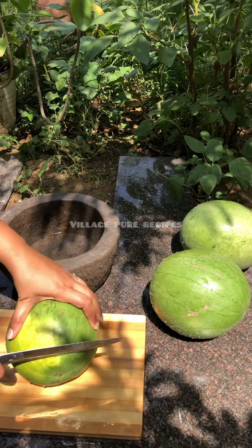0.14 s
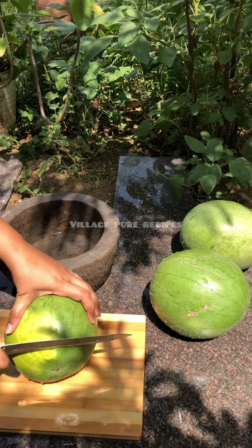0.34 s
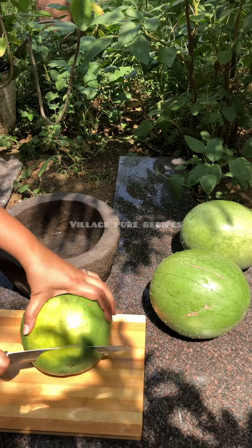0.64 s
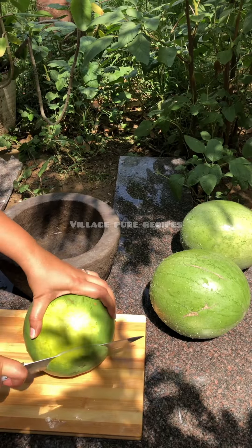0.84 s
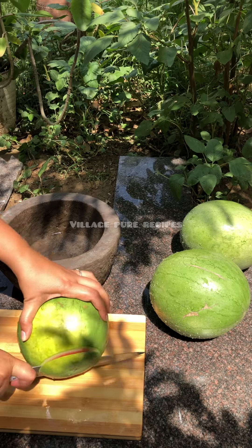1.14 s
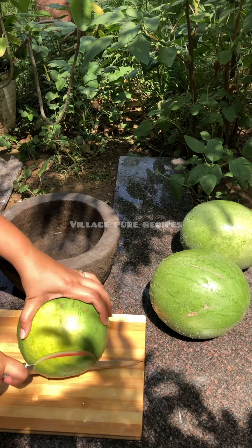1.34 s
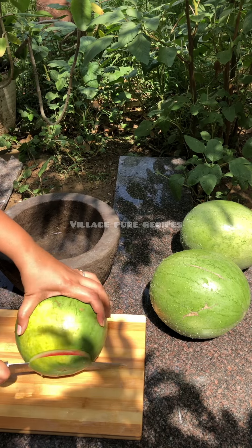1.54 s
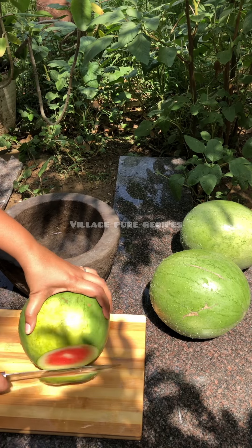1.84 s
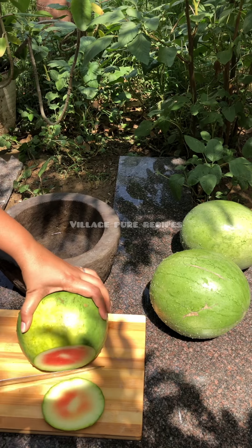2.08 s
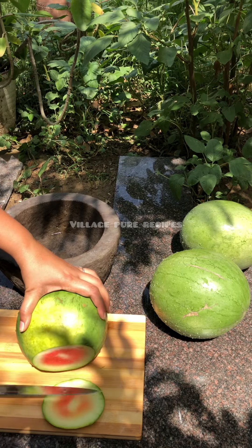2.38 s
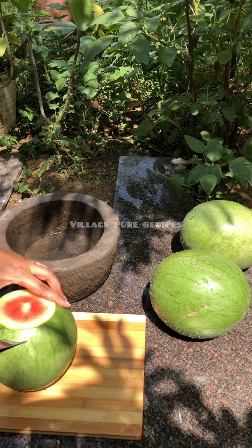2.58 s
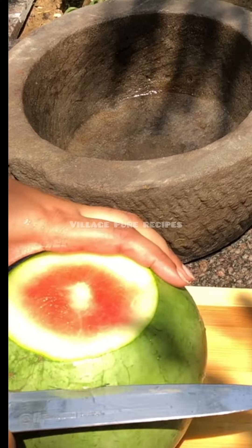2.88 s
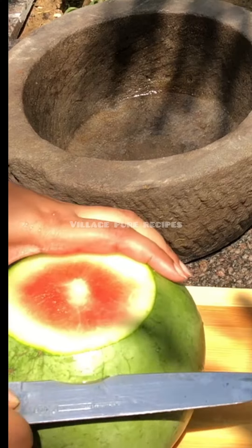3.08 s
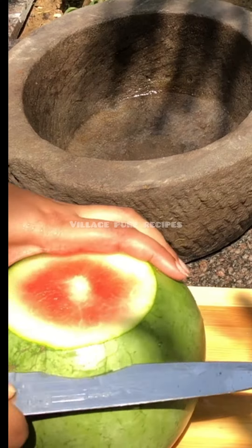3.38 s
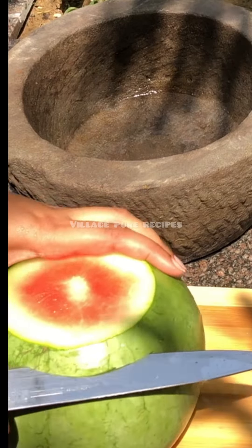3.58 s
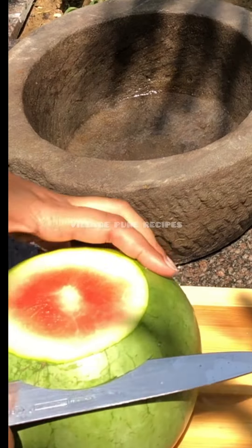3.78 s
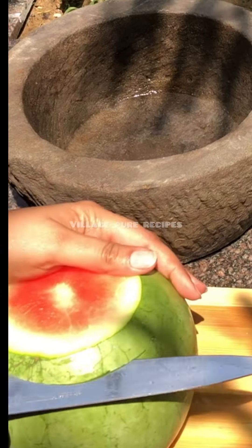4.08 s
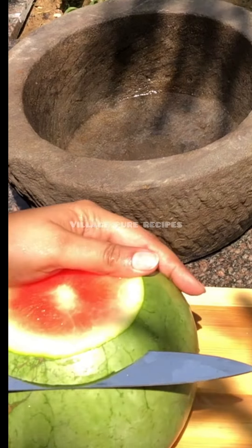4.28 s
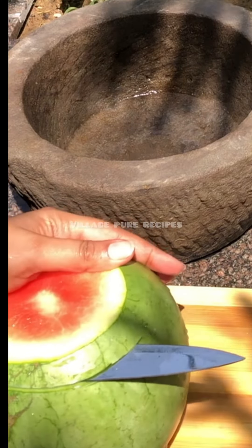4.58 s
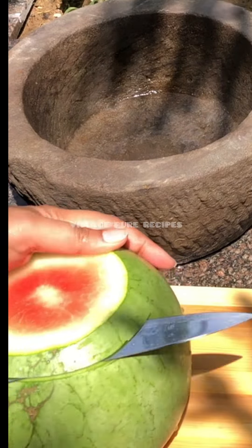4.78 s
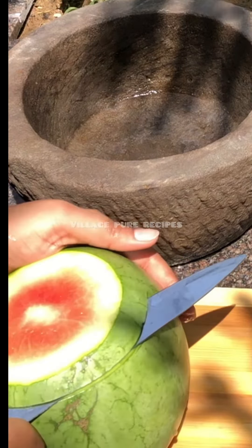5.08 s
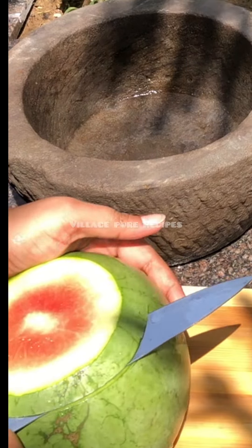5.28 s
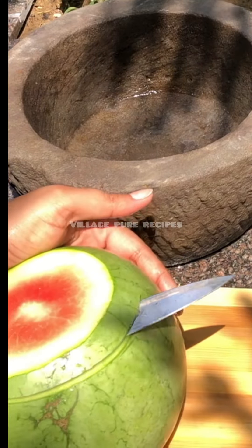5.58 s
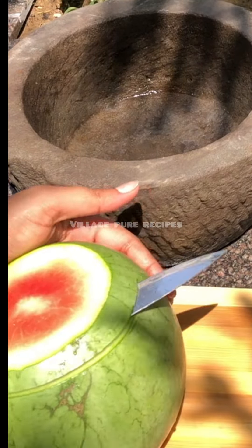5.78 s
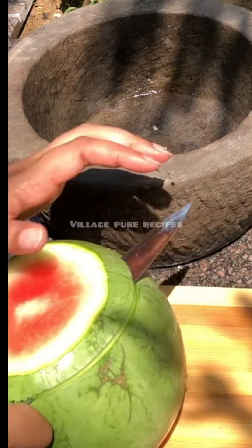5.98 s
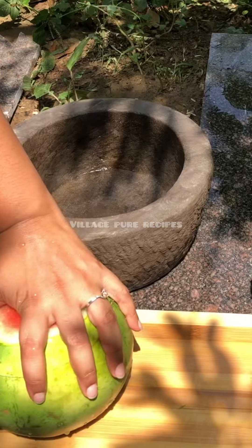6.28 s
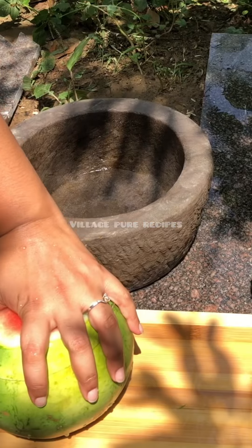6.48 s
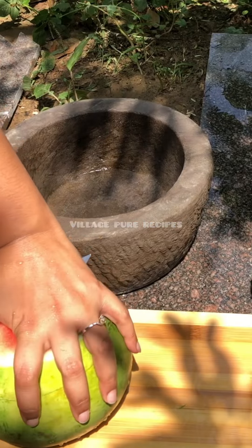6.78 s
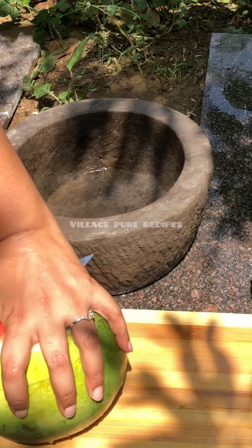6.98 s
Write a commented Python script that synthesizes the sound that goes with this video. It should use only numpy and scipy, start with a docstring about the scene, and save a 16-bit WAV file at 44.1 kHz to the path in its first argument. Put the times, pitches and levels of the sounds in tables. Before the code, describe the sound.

In an open garden, a near microphone catches soft, brief tearing noises from a knife in melon rind, growing crunchier, then a hard crack against a board and a small wet slap. More spaced crunches, tiny squeaks and dull bumps come after. Behind them lie low engine drone, an intermittent motor hum, faint hiss, sparse small birds and one raspy screech near the end.

```python
"""A kitchen knife slices a watermelon on a wooden board in a garden yard: bursts of clicks make the tearing rind.
The rind tears in short crackling strokes and the hollow fruit rings; the blade breaks through with a crack
on the board, and the slice flops over with wet smacks, made of fast-fading noise.
Behind, harmonics make a far throbbing engine and an electric motor that hums on and off. Small birds chirp,
a larger one screeches through a resonant throat, and shaped noise gives the garden's wash, rumble and hiss."""
import sys
import numpy as np
from scipy import signal
from scipy.fft import rfft, irfft, next_fast_len
from scipy.io import wavfile
from scipy.ndimage import uniform_filter1d

SR = 44100
rng = np.random.default_rng(int(sys.argv[2]) if len(sys.argv) > 2 else 0)


def generate_wav(signal):
    """Clip the signal to [-1, 1] and save it as 16-bit WAV at the path in sys.argv[1]."""
    frames = np.transpose(np.atleast_2d(signal))
    scaled = np.clip(frames, -1, 1) * 32767
    pcm = np.round(scaled).astype(np.int16)
    wavfile.write(sys.argv[1], SR, pcm)


N = 314785
T = np.arange(N) / SR  # seconds


def from_db(db):
    """Decibels to gain."""
    return 10 ** (np.asarray(db) / 20)


def rms_one(x):
    """Scale to unit power."""
    return x / np.sqrt(np.mean(x ** 2) + 1e-20)


def at_hz(points, hz, axis=1):
    """Read a table column on a log-frequency axis."""
    points = np.array(points)
    return np.interp(np.log(np.maximum(hz, 1)), np.log(points[:, 0]), points[:, axis])


def coloured(x, spectrum, tilt_db=0):
    """Filter a noise by a spectrum, tilted in dB per octave, and scale it to rms 1."""
    size = next_fast_len(len(x))
    hz = np.maximum(np.fft.rfftfreq(size, 1 / SR), 1)
    gain = from_db(at_hz(spectrum, hz) + tilt_db * np.log2(hz))
    return rms_one(irfft(rfft(x, size) * gain, size)[:len(x)])


def drift(rate):
    """Random wander of rms 1: straight lines between random points, so many per second."""
    own_rng = np.random.default_rng(rng.integers(2 ** 31))
    knots = own_rng.standard_normal(int(T[-1] * rate) + 2)
    return rms_one(np.interp(T * rate, np.arange(len(knots)), knots))


def cycles(hz):
    """Running phase in radians of a moving frequency, from a random start."""
    return 2 * np.pi * (np.cumsum(hz) / SR + rng.random())


def swell(s, rise, fall):
    """A bell-shaped envelope with its own rise and fall in seconds."""
    distance = (T - s) / np.where(T < s, rise, fall)
    return np.exp(-np.minimum(distance ** 2 / 2, 30))


def tap(s, db):
    """A single push, one sample long."""
    return from_db(db) * (np.arange(N) == round(s * SR))


def ring(force, modes):
    """A force sets damped modes ringing, neighbours in opposite sense."""
    out = 0
    for k, (hz, db, t60) in enumerate(modes):
        radius = np.exp(-np.log(1000) / (t60 * SR))
        angle = 2 * np.pi * hz / SR
        feedback = [1, -2 * radius * np.cos(angle), radius ** 2]
        mode = signal.lfilter([0, np.sin(angle)], feedback, force + 1e-18)
        out = out + (-1) ** k * from_db(db) * mode
    return out


def low_pass(x, hz, order=2):
    """Take the edge off."""
    return signal.sosfilt(signal.butter(order, min(hz, SR / 2 - 100), fs=SR, output="sos"), x)


def whistles(rows, waver):
    """Short unsteady sine tones under bell-shaped envelopes."""
    wobble = 1 + waver * drift(700)
    out = 0
    for s, hz, length, db in rows:
        tone = np.sqrt(2) * np.sin(cycles(hz * wobble))
        out = out + from_db(db) * swell(s, length, length) * tone
    return out


# Knife strokes. Each row: peak in seconds, bell spread in seconds, tearing level in dB,
# brightness in dB per octave, level of the melon's hollow ring in dB.
STROKES = [(0.526, .024, -69, -1, -83.5), (.657, 0.011, -72.5, 1, -80), (0.807, 0.038, -65, -2, -84),
           (1.11, 0.027, -62.5, 2, -60), (1.15, .029, -53, 0, -63), (1.491, 0.049, -69, -4.5, -65.5),
           (1.61, 0.026, -66, -2, -83), (1.70, .032, -56.5, -1.5, -70), (1.861, 0.021, -62, -2, -60),
           (2.667, 0.0086, -69, 2.5, -84), (3.446, 0.02, -62, -3, -61.5), (3.623, 0.021, -63, -2.5, -60.5),
           (4.163, 0.025, -56, -1, -56.5), (4.586, 0.028, -58, -1, -57.5), (4.788, .017, -72.5, 0, -76.5),
           (5.335, .045, -67.5, -.5, -80), (5.447, 0.029, -69.5, -1.5, -77), (5.51, 0.017, -60, -.5, -69),
           (5.605, .025, -57.5, -2.5, -55.5), (5.812, 0.032, -74, -4, -80), (6.3, .03, -68.5, -2.5, -72)]
# Colour of tearing rind. Each row: frequency in Hz, density in dB per Hz.
RIND = [(250, -18.5), (600, -10), (1100, -3.5), (1600, -1), (2000, -6), (2500, -2), (2950, -2.5), (3500, 0),
        (4500, -1.5), (6000, -5), (8200, -9.5), (10000, -16), (15000, -25)]
# Modes of the hollow melon. Each row: frequency in Hz, level in dB, t60 in seconds.
MELON = [(231, -3, 0.046), (438, -1, .075), (675, -13.5, .06)]
# Wet rind squeaking on the steel. Each row: peak in seconds, pitch in Hz, bell spread in seconds, level in dB.
SQUEAKS = [(1.108, 3780, 0.011, -55.5), (1.68, 2480, 0.03, -62), (5.595, 4400, 0.016, -60)]


def slicing(cells_per_s, size_db, judder_db, patchy_db):
    """Cells burst in dense uneven clicks under the blade and shake the hollow fruit."""
    sizes = from_db(size_db * np.minimum(rng.exponential(1, N), 4)) * rng.choice([-1, 1], N)
    bursting = rng.random(N) < cells_per_s / SR
    bursts = sizes * bursting * from_db(judder_db * drift(220))
    hollow = rms_one(ring(bursts, MELON))
    hz = np.geomspace(250, 15000, 40)
    out = np.zeros(N)
    for s, length, tear_db, tilt_db, hollow_db in STROKES:
        near = np.abs(T - s) < 1 / 4
        speed = swell(s, length, length)
        # each stroke gets its own random, patchy colour
        patchy = patchy_db * rng.standard_normal(len(hz))
        colour = np.column_stack([hz, at_hz(RIND, hz) + patchy])
        out[near] += from_db(tear_db) * speed[near] * coloured(bursts[near], colour, tilt_db)
        out += from_db(hollow_db) * speed * hollow
    return out + whistles(SQUEAKS, waver=0.05)


def grit(colour, decay_s, tilt_db=0):
    """A short burst of snapping fibres: coloured noise, fading fast."""
    t = T[:SR // 10]
    return coloured(rng.standard_normal(len(t)), colour, tilt_db) * np.exp(-t / decay_s)


# Flesh parting or landing. Each row: start in seconds, level in dB, decay in seconds, brightness in dB per octave.
SMACKS = [(1.8544, -52, 0.0018, 1), (1.8673, -40.5, 0.0035, -1.5), (1.9715, -22.5, 0.0016, -2),
          (2.089, -56.5, 0.0025, -1.5), (3.939, -52.5, 0.0041, -3.5)]
# Colour of the smacks. Each row: frequency in Hz, density in dB per Hz.
WET_FLESH = [(400, -19.5), (1200, -13.5), (1800, -2.5), (2600, 1.5), (3900, -3), (4800, -16), (7500, -14.5),
             (11500, -19), (15500, -30.5)]


def smacks(rise_s):
    """Wet flesh tears free or slaps the wood: grit with a softened onset."""
    out = np.zeros(N)
    for s, db, decay_s, tilt_db in SMACKS:
        burst = from_db(db) * grit(WET_FLESH, decay_s, tilt_db)
        start = round(s * SR)
        out[start:start + len(burst)] += burst * np.tanh(T[:len(burst)] / rise_s)
    return out


# Soft bumps of the melon on the board. Each row: start in seconds, push in dB.
BUMPS = [(1.49, -62), (1.975, -33), (3.462, -53), (3.635, -48), (3.944, -49.5), (5.405, -49), (5.616, -40),
         (5.92, -51.5)]


def bumps():
    """Each soft bump is one push that rings the melon's hollow modes."""
    return ring(sum(tap(s, db) for s, db in BUMPS), MELON)


# Hard contacts. Each row: start in seconds, click push in dB, click hardness (low-pass) in Hz,
# board thud push in dB, thud hardness (low-pass) in Hz.
BLOWS = [(1.8774, 2.5, 12000, -1, 4950), (1.9716, -39, 1993, -31, 688), (2.0756, -52, 7006, -37.5, 1203),
         (3.941, -37.5, 1300, -33, 607.5), (5.916, -54.5, 1300, -39, 991), (5.972, -62, 1390, -45.5, 1000)]
# Modes of the blade's click. Each row: frequency in Hz, level in dB, t60 in seconds.
BLADE = [(1300, -8, 0.004), (1850, -9, .006), (3050, -9.5, .009), (4620, -5.5, 0.0054), (5213, -11, .007),
         (6250, -17, .008), (7300, -20.5, 0.0071), (8680, -27.5, 0.0094), (10800, -26.5, 0.0034)]
# Modes of the wooden board. Each row: frequency in Hz, level in dB, t60 in seconds.
BOARD = [(224, -37, 0.03), (435, -16.5, 0.03), (585, -7.5, 0.02), (860, -5.5, 0.017), (1185, -16, .03),
         (1572, -15, .022), (1850, -21.5, .03), (2480, -11, 0.02), (3307, -30, 0.02)]
THUD_LAG_S = .0027


def blows(crack_db, crack_s, echo_db, echo_top_hz):
    """The edge clicks first, then the weight behind it thuds into the board; both scatter round the yard."""
    click = sum(low_pass(tap(s, db), hz) for s, db, hz, _, _ in BLOWS)
    thud = sum(low_pass(tap(s + THUD_LAG_S, db), hz) for s, _, _, db, hz in BLOWS)
    crack = from_db(crack_db) * signal.fftconvolve(thud, grit(RIND, crack_s))[:N]
    # heard from all sides at once, the modes blur into an even echo
    contact = low_pass(click + thud, echo_top_hz, order=3)
    echo = from_db(echo_db) * yard(contact, stretch=0.93, build_s=.0045)
    return ring(click, BLADE) + ring(thud, BOARD) + crack + echo


# The yard's echo. Each row: frequency in Hz, level in dB, t60 in seconds before stretching.
YARD = [(200, -8, .45), (450, 0.5, .45), (900, -0.5, 0.714), (1800, -1, 0.33), (3470, -7.5, 0.24),
        (6000, -8, .34), (12000, -3, 0.13)]


def yard(x, stretch, build_s):
    """Scatter from walls and leaves builds up, then dies band by band; stretch lengthens the ring."""
    t, tail = T[:SR], 0
    edges = np.geomspace(140, 16000, 13)
    for low, high in zip(edges, edges[1:]):
        hz = np.sqrt(low * high)
        band_pass = signal.butter(2, [low, high], "band", fs=SR, output="sos")
        band = signal.sosfilt(band_pass, rng.standard_normal(SR))
        t60 = stretch * at_hz(YARD, hz, axis=2)
        tail = tail + band * from_db(at_hz(YARD, hz)) * np.exp(-np.log(1000) * t / t60)
    tail = tail * (1 - np.exp(-(t / build_s) ** 2))
    return signal.fftconvolve(x, tail / np.linalg.norm(tail))[:N]


# Pushes of the screech. Each row: peak in seconds, rise in seconds, fall in seconds, level in dB before distance.
SCREECH_PUSHES = [(6.372, .0075, .034, -49), (6.468, .021, 0.024, -49)]
# Resonances of the larger bird's throat. Each row: frequency in Hz, level in dB.
THROAT = [(1000, -32), (1700, -22), (2100, -12.5), (2600, -3), (2850, -6), (3050, -21), (3300, -15),
          (3550, 0), (3950, 1), (4400, -3), (4950, -6), (5600, -14), (6300, -15), (7000, -26), (10000, -34),
          (14000, -50)]
# Thin chirps of small birds. Each row: peak in seconds, pitch in Hz, bell spread in seconds,
# level in dB before distance.
CHIRPS = [(.965, 4535, 0.019, -68.5), (3.13, 3710, 0.015, -68), (3.725, 5450, 0.025, -71),
          (6.17, 3804, 0.031, -70.5)]
# the screech arches up from its resting pitch and back
SCREECH_S, SCREECH_REST_HZ, SCREECH_TOP_HZ = 6.414, 850, 1400
ARCH_RISE_S, ARCH_FALL_S = .034, .046


def birds():
    """A harsh arched call, its jittering harmonics sweeping through the throat's resonances; small chirps."""
    arch = swell(SCREECH_S, ARCH_RISE_S, ARCH_FALL_S)
    pitch = SCREECH_REST_HZ + (SCREECH_TOP_HZ - SCREECH_REST_HZ) * arch
    pitch = pitch * (1 + .022 * drift(700))
    phase = cycles(pitch)
    call = sum(from_db(at_hz(THROAT, k * pitch)) * np.sin(k * phase) for k in range(1, 5))
    rasp = from_db(-7) * coloured(rng.standard_normal(N), THROAT)
    effort = sum(from_db(db) * swell(s, rise, fall) for s, rise, fall, db in SCREECH_PUSHES)
    roughness = from_db(2.0 * drift(180))
    return effort * roughness * (call + rasp) + whistles(CHIRPS, waver=0.13)


# Faint low hoots. Each row: peak in seconds, pitch in Hz, bell spread in seconds, level in dB.
HOOTS = [(.45, 741, 0.018, -64.5), (4.11, 670, 0.036, -65), (6.065, 644, 0.02, -62)]


def hoots():
    """Each hoot is a short, slightly unsteady low tone."""
    return whistles(HOOTS, waver=0.039)


SHIFT_S = 0.046  # length of the slide between stretches


def stepped(rows):
    """Each column holds its value, then slides to the next row's, centred on that row's start."""
    s, *columns = np.transpose(rows)
    row = np.maximum(np.searchsorted(s, T, side="right") - 1, 0)
    return [uniform_filter1d(c[row], max(int(SHIFT_S * SR), 1)) for c in columns]


# The background in stretches. Each row: start in seconds, engine level in dB, pitch that booms most in Hz,
# wash level in dB, rumble level in dB, clatter level in dB.
STRETCHES = [(0, -62, 169, -64, -57, -63.5), (.502, -55.5, 148.7, -63.5, -56.5, -64),
             (2.489, -56.5, 150.1, -65, -61.5, -75), (2.829, -64.5, 157.8, -65.5, -63, -76.5),
             (6.108, -68.5, 219.5, -65.5, -63.5, -78)]
# Colour of the engine's exhaust. Each row: frequency in Hz, level in dB.
EXHAUST = [(45, -13.5), (75, -14.5), (100, -12), (123, -5.5), (137, -3.5), (147, -2), (170, -4.5),
           (195, -4), (221, -4), (250, -24), (340, -16.5)]
# The drone swelling around one pitch. Each row: peak in seconds, bell spread in seconds, pitch in Hz, gain in dB.
SWELLS = [(.85, .16, 119, 7), (.85, .16, 224, 6), (1.501, .17, 204, 13), (2.3, .14, 151.7, 5),
          (4.85, .6, 175.4, 10.5), (5.501, .42, 227.7, 8.5)]
# the engine idles, is throttled up once, and creeps faster from then on
IDLE_FIRINGS_PER_S, CREEP_PER_S2 = 24.55, .5
THROTTLE_AT_S, THROTTLE_S, THROTTLE_ADDED_FIRINGS_PER_S = 2.42, .6, 1.9


def engine(fading_db, boom_db, boom_width_hz, swell_width_hz):
    """Harmonics of the firing rate; on the long path they fade and swell, and one region carries best."""
    db, boom_hz, *_ = stepped(STRETCHES)
    since = np.maximum(T - THROTTLE_AT_S, 0)
    throttle = THROTTLE_ADDED_FIRINGS_PER_S * np.minimum(since / THROTTLE_S, 1)
    rate = IDLE_FIRINGS_PER_S + throttle + CREEP_PER_S2 * since
    swells = [(hz, gain_db * swell(s, length, length)) for s, length, hz, gain_db in SWELLS]
    phase, out = cycles(rate), 0
    for k in range(2, 14):
        hz = k * rate
        lift_db = boom_db / (1 + ((hz - boom_hz) / boom_width_hz) ** 2)
        for centre_hz, gain_db in swells:
            lift_db = lift_db + gain_db / (1 + ((hz - centre_hz) / swell_width_hz) ** 4)
        level_db = at_hz(EXHAUST, hz) + lift_db + fading_db * drift(2.6)
        out = out + from_db(level_db) * np.sin(k * phase + 2 * np.pi * rng.random())
    return from_db(db) * out


# Runs of the electric motor. Each row: switched on in seconds, switched off in seconds, coasting in seconds,
# level in dB, unsteadiness from 0 to 1.
MOTOR_RUNS = [(0, 0.278, 0.29, -51.5, .75), (.86, 2.4, 0.38, -52, .06), (2.799, 5.118, 0.24, -51.3, 0.07),
              (6.085, 7.199, .3, -50.5, .06)]
# Hum and overtones. Each row: multiple of the hum's pitch, level in dB.
MOTOR_LINES = [(1, 0), (2, -6.5), (3, -25), (4, -26.5)]
MOTOR_HZ, SPIN_UP_S, SAG_HZ_PER_S, BEATS_PER_S = 99.9, 0.052, 39, 7.2


def motor(beat_depth, waver_hz, flutter_db):
    """Magnetic hum with a few overtones; it beats when it labours, and sags and dies once switched off."""
    out = np.zeros(N)
    waver = waver_hz * drift(4)
    flutter = from_db(flutter_db * drift(18))
    for on, off, coast_s, db, unsteady in MOTOR_RUNS:
        running = (T >= on) & (T < off + coast_s)
        age = T[running] - on
        coasting = np.maximum(T[running] - off, 0)
        phase = cycles(MOTOR_HZ + waver[running] - SAG_HZ_PER_S * coasting)
        level = from_db(db) * np.minimum(age / SPIN_UP_S, 1) * (1 - (coasting / coast_s) ** 3)
        hum = 0
        for multiple, line_db in MOTOR_LINES:
            # a labouring motor loses its overtones
            kept = 1 if multiple == 1 else 1 - unsteady
            hum = hum + from_db(line_db) * kept * np.sin(multiple * phase)
        beating = 1 - beat_depth * unsteady * np.cos(2 * np.pi * BEATS_PER_S * age)
        out[running] += np.sqrt(2) * level * hum * beating
    return out * flutter


# Colour of the garden's wash. Each row: frequency in Hz, level in dB.
AIR = [(130, -25), (280, -4), (400, -4.5), (520, -7.5), (660, -8), (820, -12.5), (1020, -14), (1230, -14.5),
       (1900, -20.5), (4000, -26), (8900, -39), (14800, -55), (15600, -70.5)]
# Colour of the far rumble. Each row: frequency in Hz, level in dB.
RUMBLE = [(20, -32.5), (45, -6), (80, 0.5), (115, 1.5), (150, -2.5), (220, -4.5), (330, -7.5), (600, -46.5)]
# Colour of far machinery clattering. Each row: frequency in Hz, density in dB per Hz.
CLATTER = [(250, -4), (400, -2), (640, -8), (740, -3.5), (840, 0), (940, -6), (1030, -11.5), (1130, -7),
           (1240, -4.5), (1420, -16), (2400, -18.5), (5000, -33.5), (12000, -60)]
# Colour of the fine hiss. Each row: frequency in Hz, level in dB.
HISS = [(1500, -16), (3500, -0.5), (7000, 0), (12000, -5.5), (14800, -13.5), (15600, -34.5)]


def air(hiss_db, wander_db):
    """Noises for the garden's wash, far rumble and clatter, each wandering a little, over a steady fine hiss."""
    *_, wash_db, rumble_db, clatter_db = stepped(STRETCHES)
    garden = 0
    for db, colour in [(wash_db, AIR), (rumble_db, RUMBLE), (clatter_db, CLATTER)]:
        level = from_db(db + wander_db * drift(3))
        garden = garden + level * coloured(rng.standard_normal(N), colour)
    hiss = from_db(hiss_db) * coloured(rng.standard_normal(N), HISS)
    return low_pass(garden + hiss, 14800, order=12)


DIP_DEPTH, DIP_FALL_S, DIP_RECOVER_S = 0.85, 0.0044, 0.0043


def level_dips():
    """The level of the whole sound dips briefly wherever a new background stretch starts."""
    dips = [1 - DIP_DEPTH * swell(s, DIP_FALL_S, DIP_RECOVER_S) for s, *_ in STRETCHES[1:]]
    return np.prod(dips, axis=0)


def scene():
    """The knife is close and dry; the birds are far and echo more."""
    melon = slicing(cells_per_s=7000, size_db=2.5, judder_db=1.57, patchy_db=2.5)
    melon = melon + smacks(rise_s=.0004) + bumps()
    near = melon + from_db(-21) * yard(melon, stretch=1.0, build_s=0.011)
    board = blows(crack_db=-24.5, crack_s=0.0027, echo_db=-6.5, echo_top_hz=6300)
    calls = birds()
    far = from_db(-2) * (calls + yard(calls, stretch=1.7, build_s=.02))
    background = engine(fading_db=0.85, boom_db=7.5, boom_width_hz=20, swell_width_hz=18)
    background = background + motor(beat_depth=.9, waver_hz=.4, flutter_db=0.7)
    background = background + air(hiss_db=-80.5, wander_db=0.37) + hoots()
    return ((near + board + far + background) * level_dips())[None]


CUTOFF_HZ = 16800  # 60 dB down from here up


def record(dry):
    """High peaks are rounded and the top is cut."""
    rounded = 1.5 * np.tanh(dry / 1.5)
    return signal.sosfilt(signal.cheby2(12, 60, CUTOFF_HZ, fs=SR, output="sos"), rounded)


dry = scene()
out = record(dry)
generate_wav(out)
```